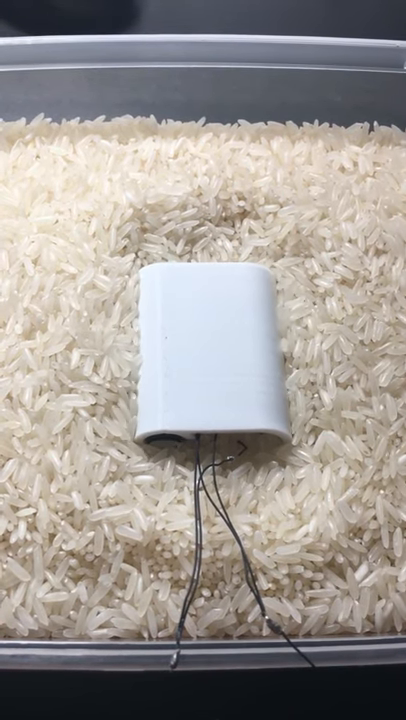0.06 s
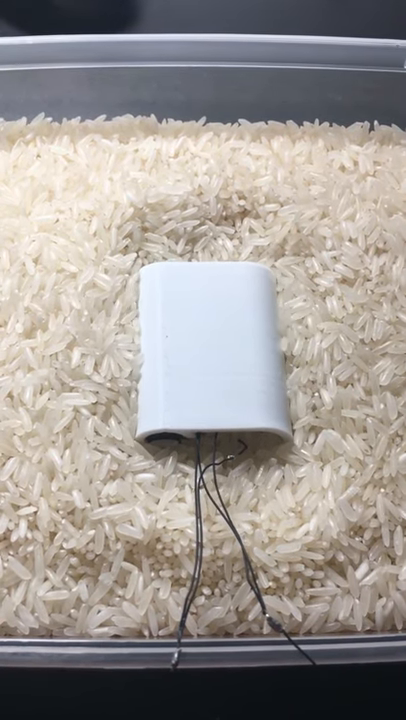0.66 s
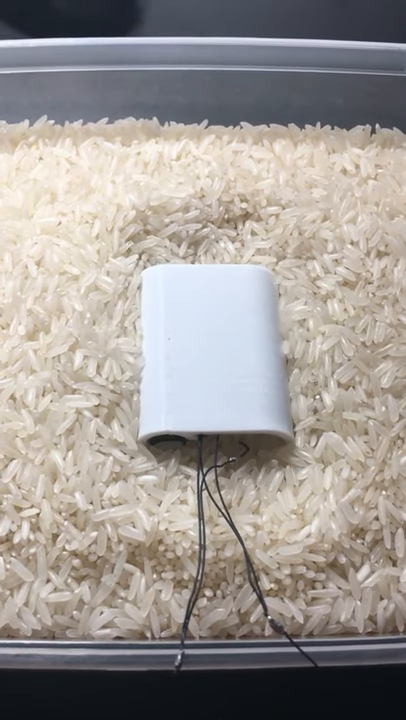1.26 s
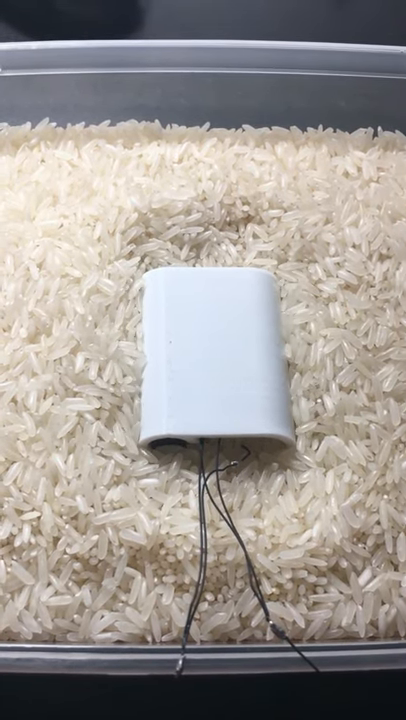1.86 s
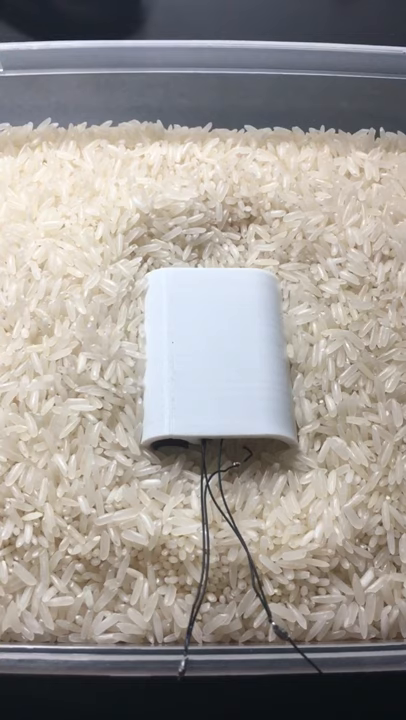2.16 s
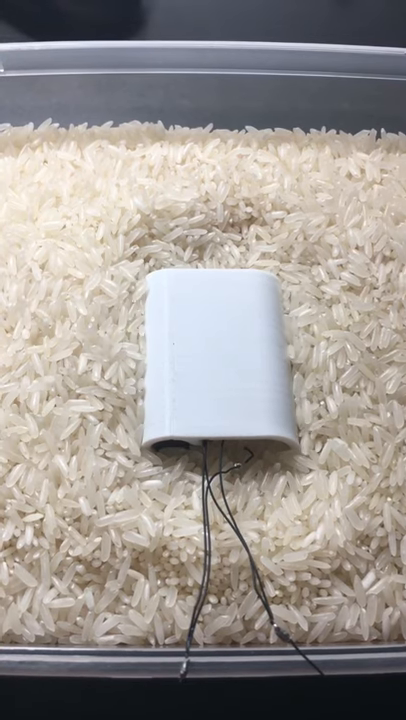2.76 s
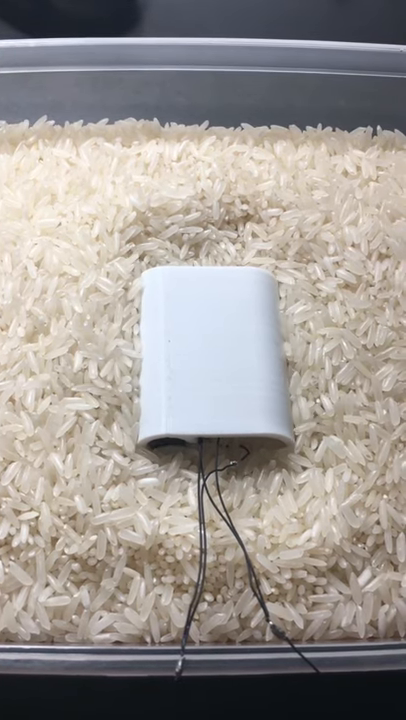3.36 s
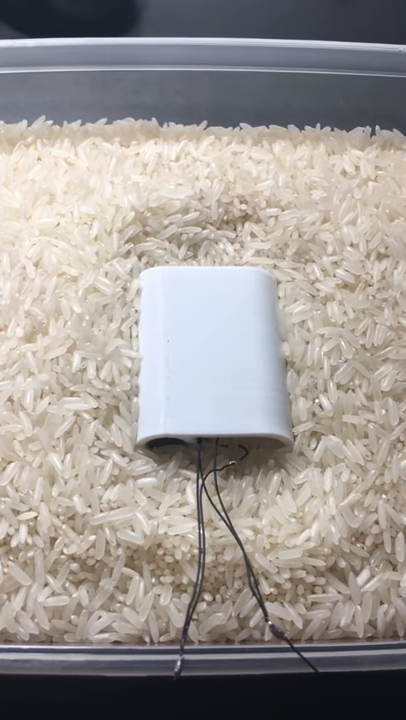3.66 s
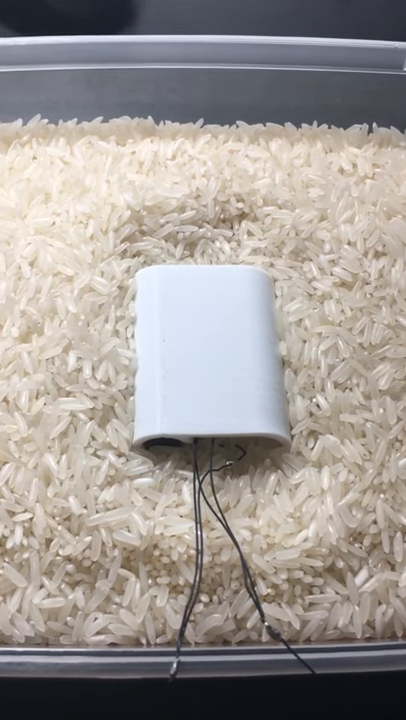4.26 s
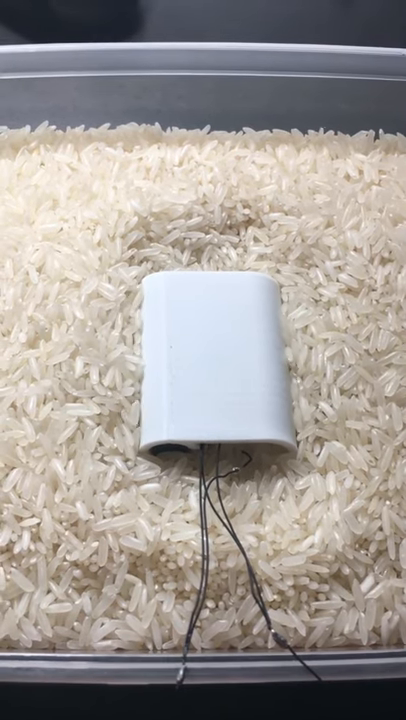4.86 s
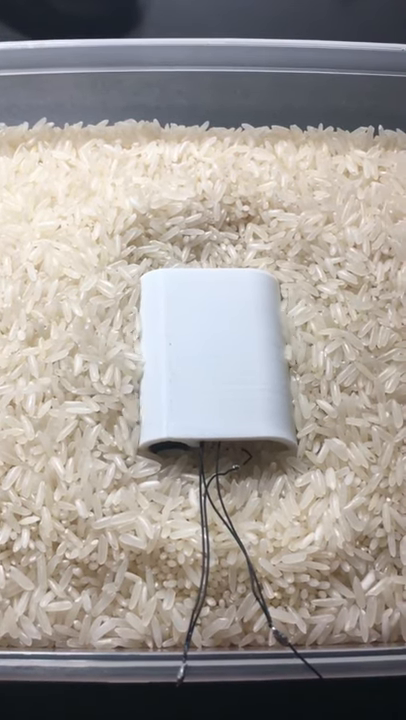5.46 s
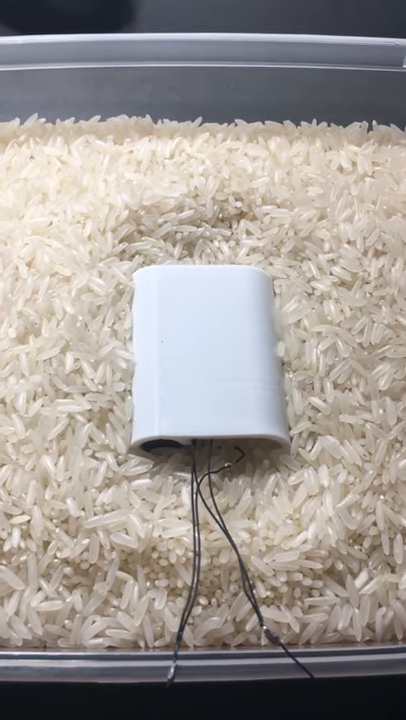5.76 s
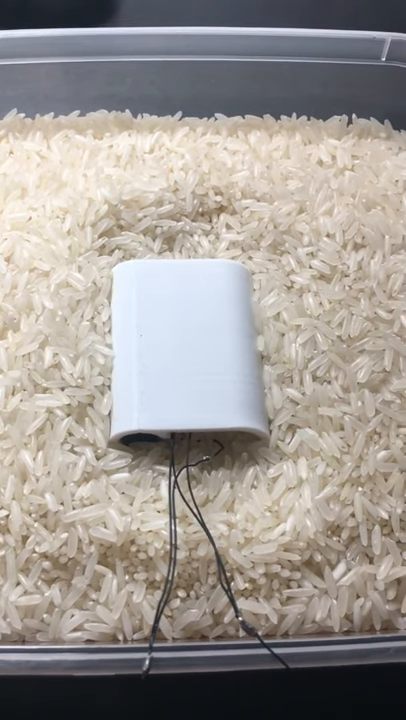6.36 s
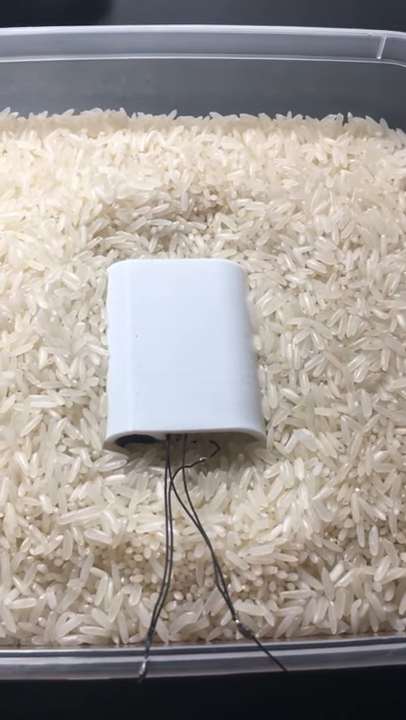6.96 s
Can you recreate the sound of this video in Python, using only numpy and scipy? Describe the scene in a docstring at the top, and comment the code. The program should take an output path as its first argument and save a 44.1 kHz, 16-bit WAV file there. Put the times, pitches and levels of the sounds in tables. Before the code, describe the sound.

A small plastic device vibrates on dry rice with a bright, rattling buzz, stops abruptly, then a switch clicks twice.

```python
"""A close, rattling buzz: a small plastic case with two motors shakes on rice in a plastic tub.
The motors spin off-centre weights at different speeds. Together they make the case hum,
knock it against the rice and throw grains at its shell. Then the power is cut,
the motors run down, and a switch clicks twice in a quiet room."""
import sys
import numpy as np
from scipy import signal
from scipy.fft import rfft, irfft, next_fast_len
from scipy.io import wavfile
from scipy.ndimage import map_coordinates

SR = 44100
rng = np.random.default_rng(int(sys.argv[2]) if len(sys.argv) > 2 else 0)


def digitize_waveform(pressure):
    """Quantize a signal to 16-bit integers and store it at the path in sys.argv[1].

    Rows of a 2-D input are taken as channels; values are limited to [-1, 1].
    """
    field = np.atleast_2d(pressure).T
    bounded = np.clip(field, -1, 1)
    quanta = np.round(bounded * 32767).astype(np.int16)
    wavfile.write(sys.argv[1], SR, quanta)


N = 309141

# The room's soft noise. Each row: frequency in Hz, relative level in dB.
ROOM_AIR = [(15, -46), (25, -33), (49, -18), (66, -20), (77, -20), (93, -16), (135, -2), (176, -11.5),
            (243, -5.5), (383, -19.5), (1460, -18.5), (3090, -32.5), (15000, -45)]
# The walls' echo. Each row: frequency in Hz, seconds to fade by 60 dB.
ECHO_TIMES = [(150, .3), (1000, .25), (5000, 0.34), (10000, 0.14), (16000, .17)]
# The button rubs twice as it comes back up. Each row: peak time in seconds, level in dB.
BUTTON_RUBS = [(6.901, -42), (6.928, -44.5)]
# The tone of that rubbing. Each row: frequency in Hz, relative level in dB.
RUB_TONE = [(88, -34), (150, -10), (772, -21), (918, -5), (1050, -17), (1570, -14), (1700, -28),
            (1950, -18.5), (6180, -39), (11700, -29), (15000, -44)]
# The switch is pressed, then released. Each row: start in seconds, snap gain in dB, thud gain in dB,
# thud delay in seconds, after-ring pitch in Hz, after-ring gain in dB.
SWITCH_CLICKS = [(6.5825, -14, -34, 0.0012, 4360, -62), (6.8998, -18.5, -47.5, 0.00078, 11800, -47)]
# How the switch's spring rings. Each row: pitch in Hz, width in Hz, relative dB pressed, then released.
SPRING_RINGS = [(4280, 1400, -10, -11.5), (6640, 1080, -11, -10), (8400, 1300, -0.5, -2.5),
                (9500, 1200, 1.5, -7), (11800, 1200, -2.5, -2), (12850, 1400, -9, 0),
                (15000, 1000, -11, -16)]
# How the switch's housing rings. Each row: pitch in Hz, width in Hz, relative level in dB.
HOUSING_RINGS = [(242, 130, -0.5), (378, 110, -7), (620, 280, -5), (890, 230, 0), (1187, 290, -10),
                 (2000, 820, -23), (4400, 800, -15)]
# The tone of grains rubbing together. Each row: frequency in Hz, relative level in dB.
RUSTLE_TONE = [(300, -22.5), (900, -20.5), (1500, -1), (2000, 1.5), (2600, -5.5), (3400, -6.5), (6000, -9),
               (14000, -30)]
# How the shell rings when grains hit it. Each row: pitch in Hz, width in Hz, relative level in dB.
SHELL_RINGS = [(2760, 990, -19), (4000, 900, -8), (4370, 600, -2.5), (5350, 550, -9.5), (6170, 2430, -9.5),
               (8320, 460, -10), (9060, 940, -4), (9900, 620, -3.5), (10920, 580, -4), (11610, 700, -5.5),
               (12790, 850, 0), (13510, 840, -6.5), (14480, 1330, -9.5), (15550, 770, -14.5)]
# The tone of the case knocking on the rice. Each row: frequency in Hz, relative level in dB.
KNOCK_TONE = [(60, -35.5), (200, -5), (500, -4.5), (800, -3), (1150, 2.5), (1750, 2), (2400, -6),
              (3200, -10), (5000, -24.5), (12000, -31.5)]
# Motor speeds with the power on. Each row: time in seconds, slow motor in Hz, fast motor in Hz.
MOTOR_SPEEDS = [(0.1, 155.6, 250.8), (0.6, 154.9, 252.1), (1.8, 153.9, 251.3), (2.3, 154.2, 250.9),
                (3.1, 152.5, 250.9), (3.7, 152.3, 250.6), (4.4, 153.0, 251.3), (5.1, 152.8, 251.6),
                (5.7, 154.5, 250.9), (6.1, 155.0, 253.6)]
# The hum's tones. Each row: multiple of the slow speed, multiple of the fast speed, relative level in dB.
# The two multiplied speeds add up to the tone's pitch.
HUM_TONES = [(-1, 1, -55), (1, 0, -45.5), (3, -1, -52), (0, 1, -46), (2, 0, -45), (4, -1, -54), (1, 1, -41),
             (3, 0, -52.5), (2, 1, -59.5), (-1, 3, -54.5), (-2, 4, -57), (3, 1, -52.5), (2, 2, -43.5),
             (1, 3, -56.5), (3, 2, -60), (0, 4, -62), (4, 2, -50.5), (6, 1, -54), (3, 3, -62), (5, 2, -55),
             (7, 1, -55), (9, 0, -54)]

TOP_HZ = 15750
POWER_OFF_S, COAST_S = 6.41, 0.115  # once off, the speed falls to about a third every COAST_S
SETTLE_DB_PER_S = 180  # the hits weaken as the motors slow
STICK_AFTER_S, STICK_DB_PER_S = 0.076, 329  # soon the grains stop being thrown and fade faster


def amp(db):
    """Turn decibels into a gain."""
    return 10 ** (np.asarray(db) / 20)


def unit(x):
    """Scale x to an average power of 1."""
    return x / np.sqrt(np.mean(x ** 2) + 1e-20)


def along(points, hz):
    """Read between (Hz, value) points on a log frequency scale."""
    freqs, values = np.transpose(points)
    return np.interp(np.log(hz + 1), np.log(freqs + 1), values)


def curves(rows):
    """One value per sample for each column after the time."""
    times, *columns = np.transpose(rows)
    return [np.interp(np.arange(N) / SR, times, column) for column in columns]


def wobble(rate):
    """A smooth curve through `rate` random values a second."""
    return map_coordinates(rng.standard_normal(int(N * rate / SR) + 4), [np.arange(N) * rate / SR])


def slope(points):
    """A tone shape drawn through (Hz, dB) points."""
    return lambda hz: amp(along(points, hz))


def peaks(rings):
    """A tone shape with a steep-sided peak for each (Hz, width, dB) row."""
    def peak(hz, centre, width):
        return (hz * width) ** 2 / ((centre ** 2 - hz ** 2) ** 2 + (hz * width) ** 2)
    return lambda hz: np.sqrt(sum((amp(db) * peak(hz, centre, width)) ** 2 for centre, width, db in rings))


def coloured(x, shape):
    """Filter x with a tone shape, scaled so that white noise keeps its power."""
    size = 8192
    gain = unit(shape(np.fft.rfftfreq(size, 1 / SR)))
    cepstrum = irfft(np.log(np.maximum(gain, 1e-6)))
    cepstrum[1:size // 2] *= 2  # folded so the filter rings after a hit, never before
    cepstrum[size // 2 + 1:] = 0
    return signal.oaconvolve(x, irfft(np.exp(rfft(cepstrum))))[:N]


def burst(start, fade_s):
    """Jump to 1 at the start, then fall 60 dB every fade_s seconds."""
    t = np.arange(N) / SR - start
    return (t >= 0) * np.exp(-np.log(1000) * np.abs(t) / fade_s)


def background(air_db=-59, drone_db=-62):
    """Quiet room air with a low, wavering drone."""
    air = amp(air_db) * coloured(rng.standard_normal(N), slope(ROOM_AIR))
    drone = amp(drone_db) * coloured(rng.standard_normal(N), peaks([(66.7, 29, 0)]))
    return air + drone


def room_echo(x):
    """The walls send the sound back, each frequency fading at its own speed."""
    hz, t, noise = signal.stft(rng.standard_normal(SR // 2), SR, nperseg=256)
    fade = np.exp(-np.log(1000) * t / along(ECHO_TIMES, hz)[:, None])
    tail = signal.istft(noise * fade, SR, nperseg=256)[1]
    return signal.fftconvolve(x, tail / np.linalg.norm(tail))[:N]


def button_rub(rise_s=0.009, fall_s=0.0096):
    """The button rubs on its way back up; each rub swells and fades."""
    t = np.arange(N) / SR
    force = sum(amp(db) * np.exp(-np.maximum((peak - t) / rise_s, (t - peak) / fall_s))
                for peak, db in BUTTON_RUBS)
    return force * coloured(rng.standard_normal(N), slope(RUB_TONE))


def switch(strike_db=13, chatter_db=-10, ring_db=-21, after_width_hz=450):
    """The spring strikes, chatters and rings on; the housing thuds; the button rubs."""
    out = button_rub()
    for stroke, (start, snap_db, thud_db, delay, after_hz, after_db) in enumerate(SWITCH_CLICKS):
        chatter = amp(chatter_db) * burst(start, fade_s=0.0091)
        ring = amp(ring_db) * burst(start, fade_s=0.042)
        snap = (chatter + ring) * rng.standard_normal(N)
        snap[round(start * SR)] += amp(strike_db)
        spring = [(hz, width, levels[stroke]) for hz, width, *levels in SPRING_RINGS]
        out += amp(snap_db) * coloured(snap, peaks(spring))
        thud = burst(start + delay, fade_s=0.079) * rng.standard_normal(N)
        out += amp(thud_db) * coloured(thud, peaks(HOUSING_RINGS))
        after_ring = burst(start, fade_s=0.25) * rng.standard_normal(N)
        out += amp(after_db) * coloured(after_ring, peaks([(after_hz, after_width_hz, 0)]))
    return out


def time_off():
    """Seconds since the power was cut, 0 before."""
    return np.maximum(np.arange(N) / SR - POWER_OFF_S, 0)


def pace():
    """The share of running speed left as friction brakes the motors."""
    return np.exp(-time_off() / COAST_S)


def settling():
    """A gain that fades with the shaking, then faster once the grains stick."""
    t = time_off()
    return amp(-SETTLE_DB_PER_S * t - STICK_DB_PER_S * np.maximum(t - STICK_AFTER_S, 0))


def rocking(fast_angle, level_db=-44, rock_hz=92, width_hz=22):
    """As it runs down, the fast motor passes the speed at which the case rocks on the rice."""
    hz = curves(MOTOR_SPEEDS)[1] * pace()
    return amp(level_db) * np.exp(-((hz - rock_hz) / width_hz) ** 2) * np.cos(fast_angle)


def rustle(rubs_per_s=7000, scatter_db=3):
    """Deeper in the shaken rice, grains keep rubbing on each other."""
    hits = rng.random(N) < rubs_per_s / SR
    rubs = hits * rng.choice([-1, 1], N) * amp(scatter_db * rng.standard_normal(N))
    return unit(coloured(rubs, slope(RUSTLE_TONE)))


def knocks(bounce, jitter_s=0.00024, scatter_db=3.5, back_share=0.4, rebound=0.31, rebound_s=0.000905):
    """The case hits the rice near each end of a swing, harder after a wide one, and rebounds once."""
    turns = signal.find_peaks(np.abs(bounce))[0]
    size_luck, time_luck, gap_luck = rng.standard_normal((len(turns), 3)).T
    side = np.where(bounce[turns] > 0, -1, back_share)
    force = bounce[turns] ** 2 * side * amp(scatter_db * np.tanh(size_luck))
    first = turns + jitter_s * SR * time_luck
    second = first + rebound_s * SR * np.exp(0.5 * gap_luck)
    when = np.clip(np.round(np.r_[first, second]).astype(int), 0, N - 1)
    hits = np.bincount(when, np.r_[force, rebound * force], N)
    return unit(coloured(hits, slope(KNOCK_TONE)))


def hum(slow_angle, fast_angle, gain_db=1.55, lead_s=0.000995, grip_db_per_hz=1.4,
        waver_db=0.4, shift_db=2.5, flutter_db=1.5, firm_db=-40, loose_span_db=12):
    """Resting unevenly, the case mixes the two spins into sum and difference tones."""
    out, t = np.zeros(N), time_off()
    slow_hz, fast_hz = curves(MOTOR_SPEEDS)
    for slow_times, fast_times, db in HUM_TONES:
        hz = slow_times * slow_hz.mean() + fast_times * fast_hz.mean()
        khz = hz / 1000
        phase = 2 * np.pi * hz * lead_s + 1.36 * khz * wobble(3)
        level = db + waver_db * wobble(14)
        if (slow_times, fast_times) == (1, 0):  # with less grip, the slow motor runs faster and louder
            level += grip_db_per_hz * (slow_hz - slow_hz.mean())
        # High, weak tones shift and flutter most as the rice moves.
        unsteady = khz * np.clip((firm_db - db) / loose_span_db, 0, 1)
        level += unsteady * (shift_db * np.tanh(wobble(1.3)) + flutter_db * wobble(35))
        level -= t * (105 + 130 * khz)  # dB a second: gentler shaking loses its high tones first
        out += amp(level) * np.cos(slow_times * slow_angle + fast_times * fast_angle + phase)
    return out * amp(gain_db)


def rattle(swing, density=18000, loose=0.24, scatter_db=1, clump_db=1):
    """Grains tick on the shell, most often at both ends of a wide swing."""
    hits = rng.random(N) < density / SR * (loose + swing ** 2)
    sizes = amp(-scatter_db * rng.standard_normal(N) + clump_db * wobble(600))
    return unit(coloured(hits * sizes * rng.choice([-1, 1], N), peaks(SHELL_RINGS)))


def buzzing_case(knock_db=-41, rattle_db=-27, rustle_db=-44, drift_hz=0.15, judder_hz=0.6, lag_rad=1.1):
    """Two spinning weights fall in and out of step, so the case's swing grows and shrinks."""
    stumble_hz = 55 * np.sqrt(pace() * (1 - pace()))  # slowing weights turn unevenly
    speeds = [hz * pace() + drift_hz * wobble(12) + (judder_hz + stumble_hz) * wobble(90)
              for hz in curves(MOTOR_SPEEDS)]
    slow_angle, fast_angle = 2 * np.pi * np.cumsum(speeds, axis=1) / SR
    swing = (np.cos(slow_angle) + 0.67 * np.cos(fast_angle)) / 2  # sideways, into the loose grains
    bounce = (np.cos(slow_angle) + 0.7 * np.cos(fast_angle - lag_rad)) / 2  # up and down
    thumps = amp(knock_db) * knocks(bounce) * settling() ** 0.69  # the heavy case outlasts the grains
    grains = (amp(rattle_db) * rattle(swing) + amp(rustle_db) * rustle()) * settling()
    return hum(slow_angle, fast_angle) + rocking(fast_angle) + thumps + grains


def scene(echo_db=-9):
    """The case is close and has no echo; the switch, further off, echoes in the room."""
    clicks = switch()
    return (buzzing_case() + clicks + amp(echo_db) * room_echo(clicks) + background())[None]


def record(dry):
    """Remove all sound above TOP_HZ."""
    size = next_fast_len(N + SR // 2)
    kept = np.fft.rfftfreq(size, 1 / SR) < TOP_HZ
    return irfft(rfft(dry, size) * kept, size)[..., :N]


dry = scene()
out = record(dry)
digitize_waveform(out)
```